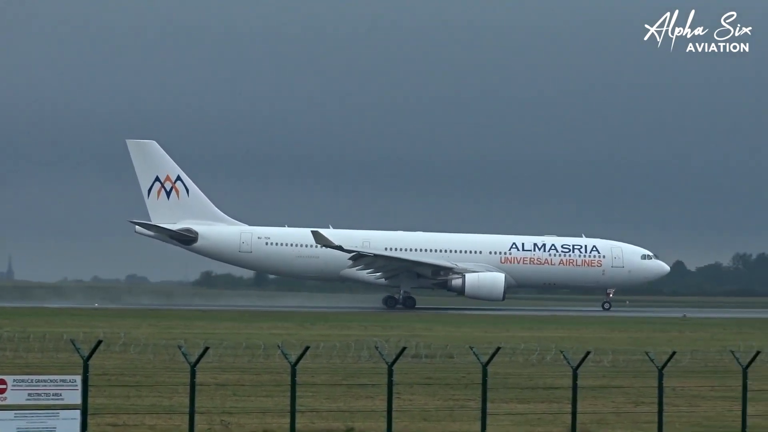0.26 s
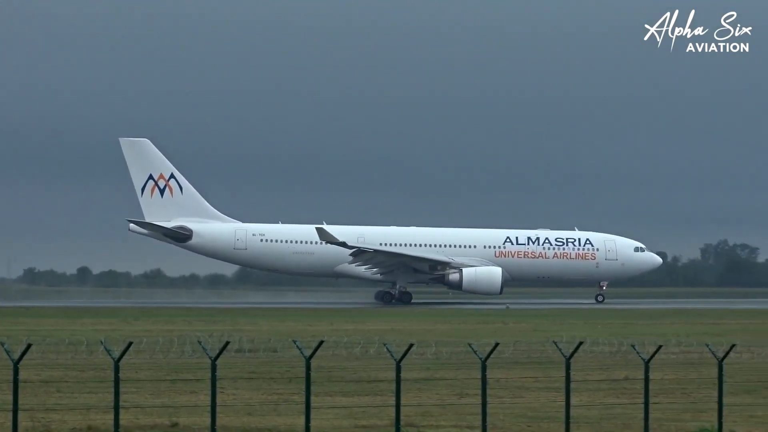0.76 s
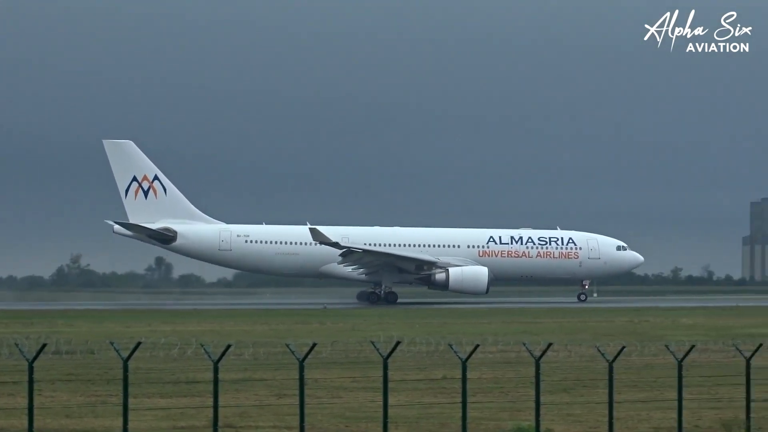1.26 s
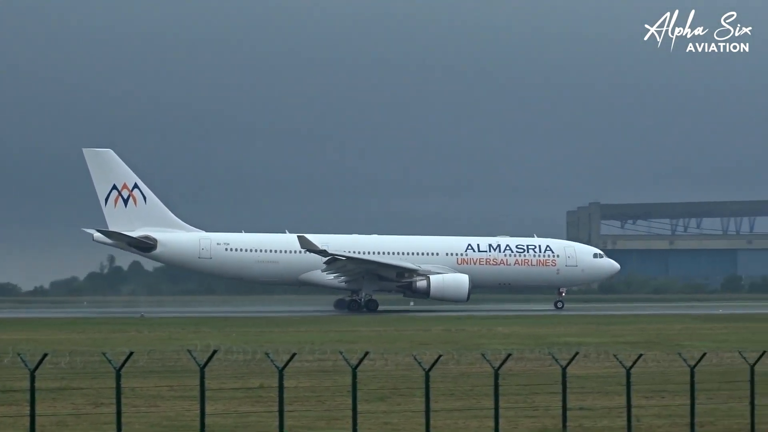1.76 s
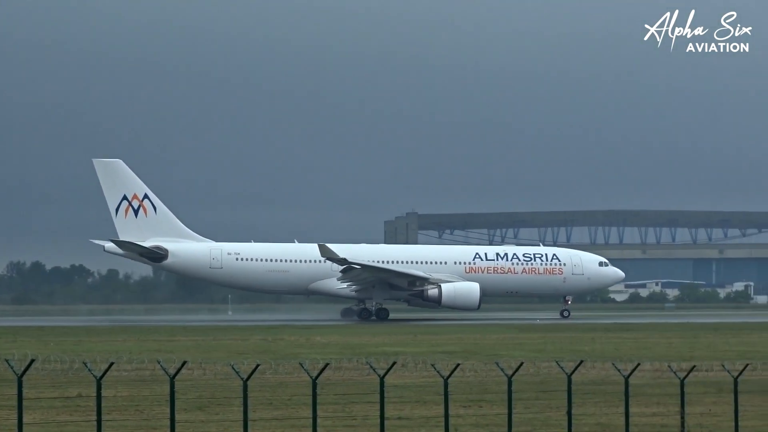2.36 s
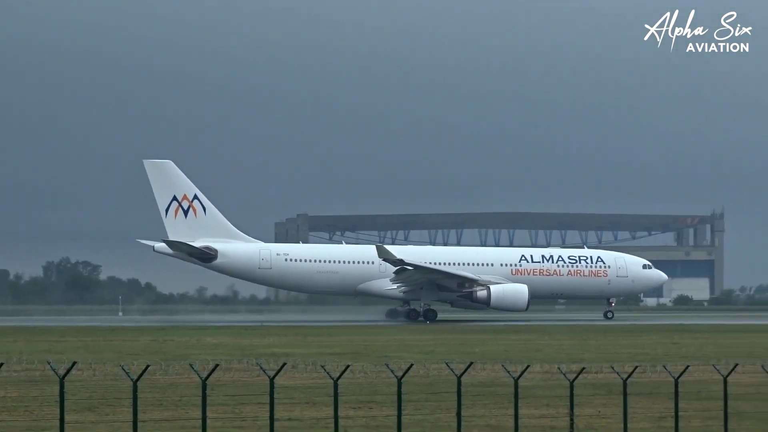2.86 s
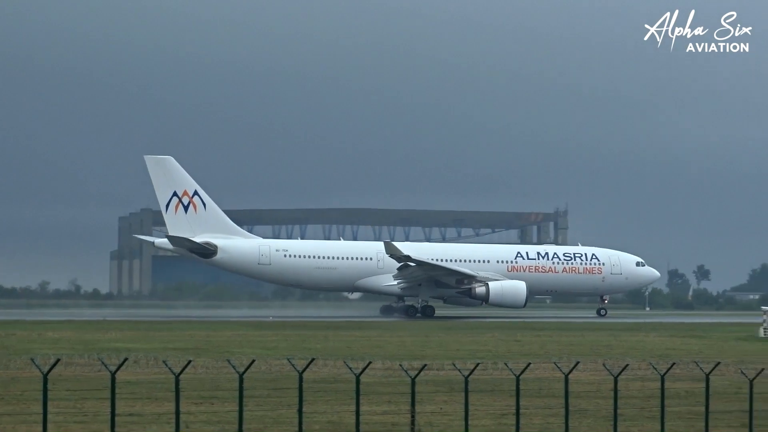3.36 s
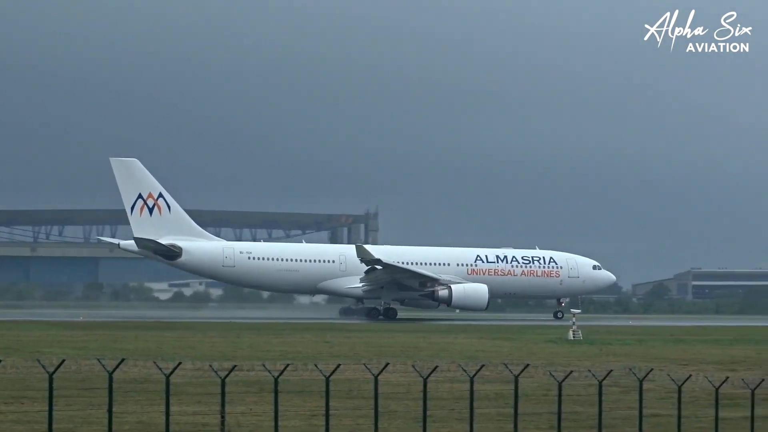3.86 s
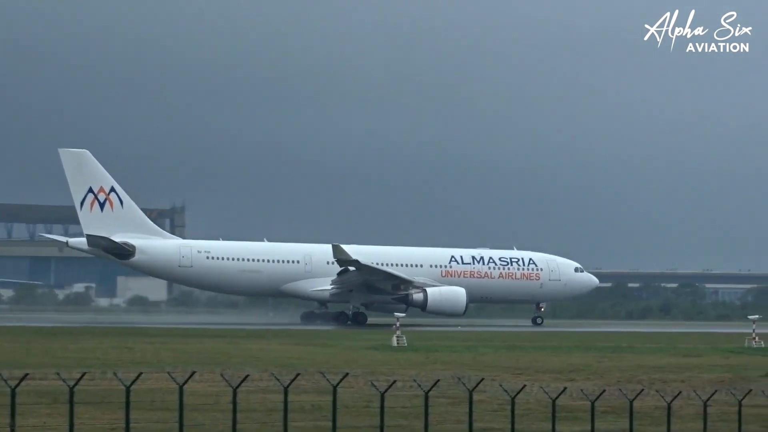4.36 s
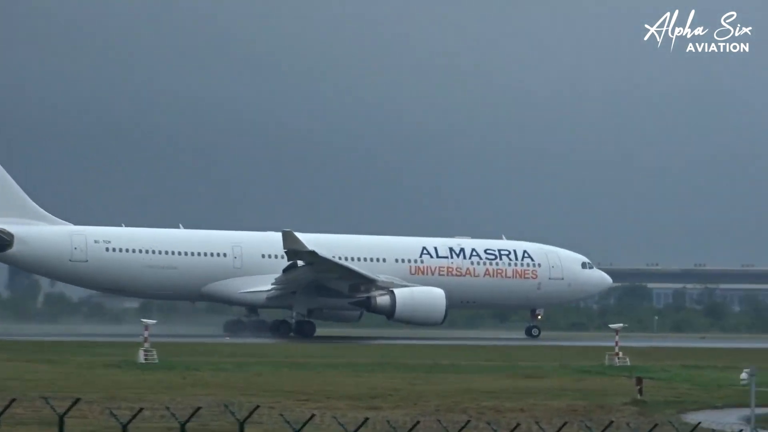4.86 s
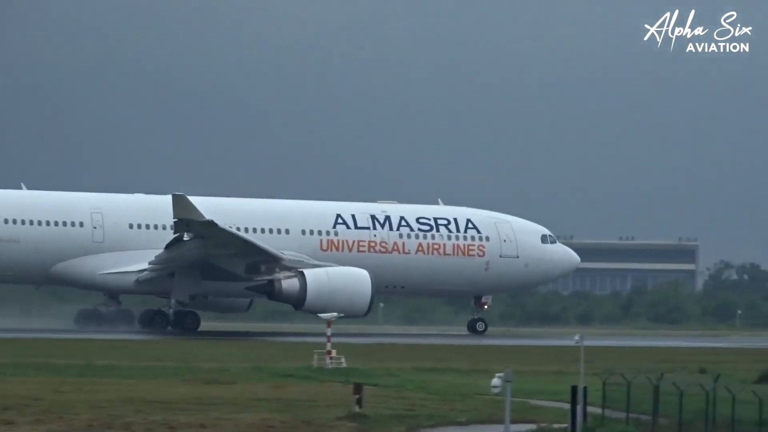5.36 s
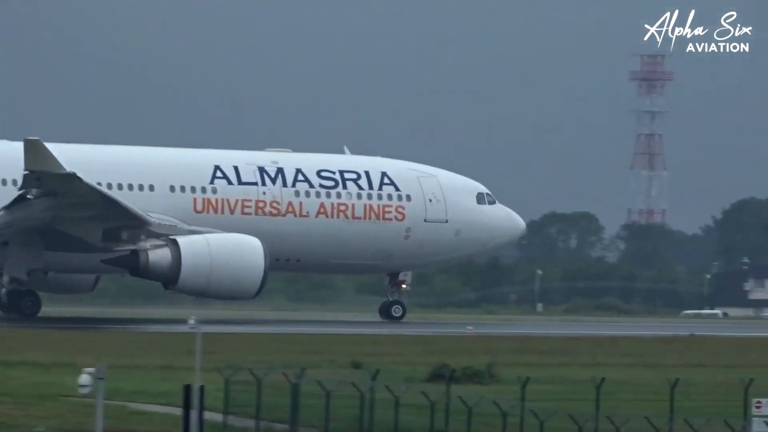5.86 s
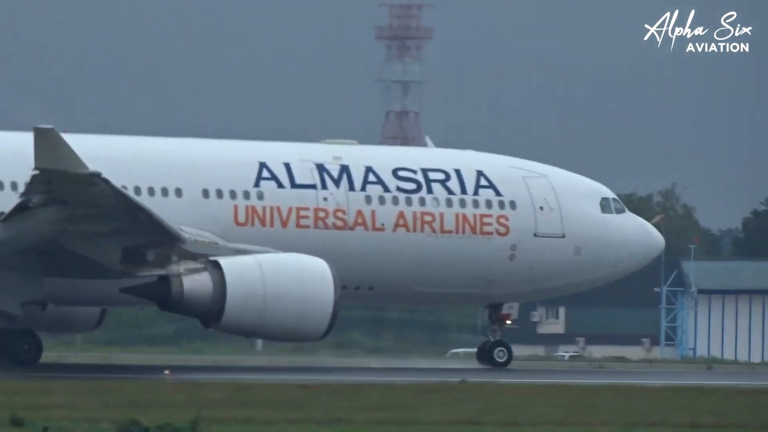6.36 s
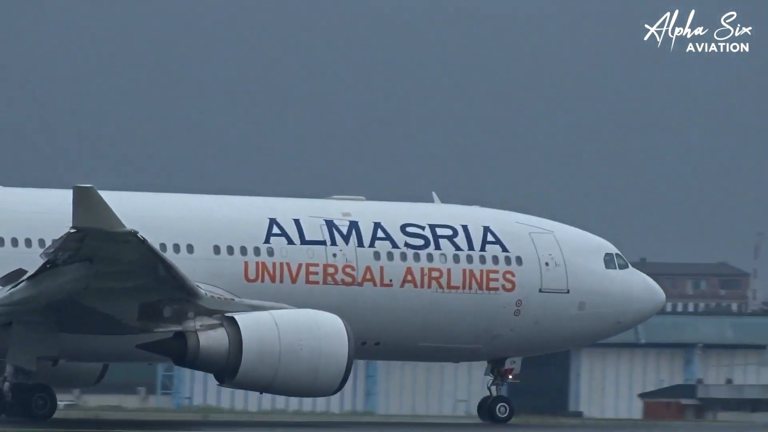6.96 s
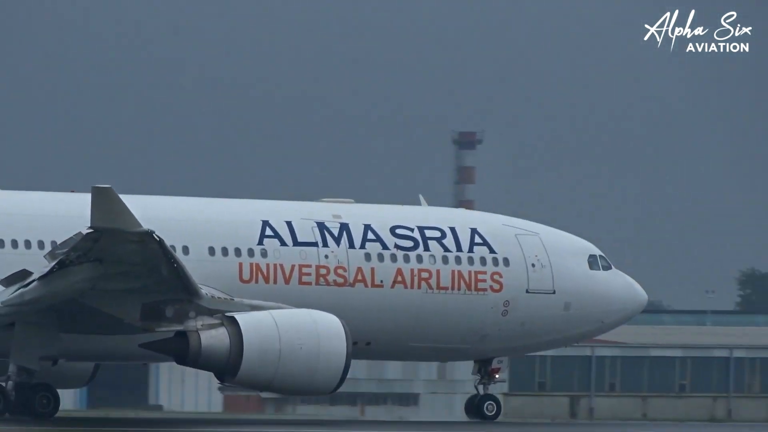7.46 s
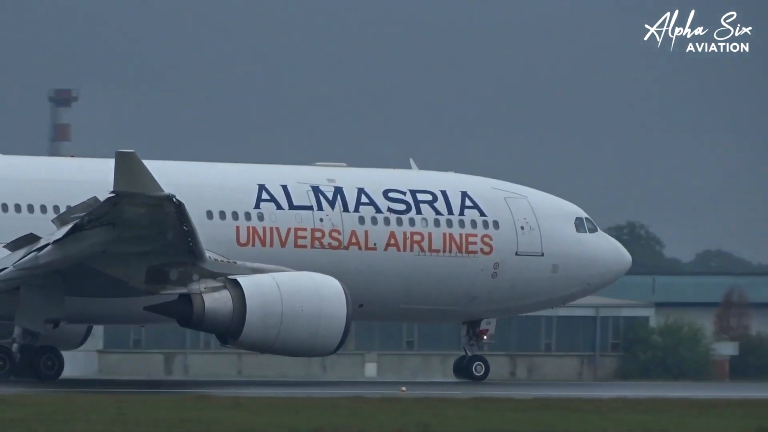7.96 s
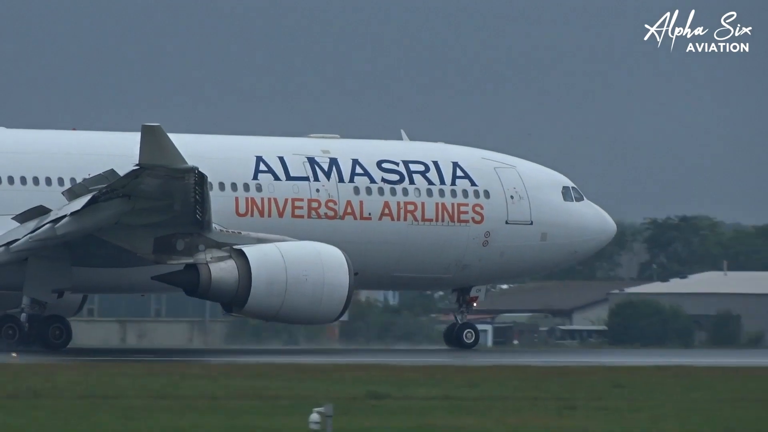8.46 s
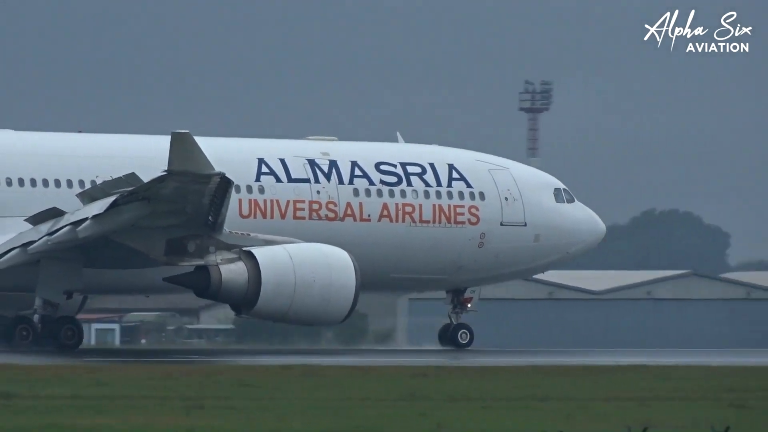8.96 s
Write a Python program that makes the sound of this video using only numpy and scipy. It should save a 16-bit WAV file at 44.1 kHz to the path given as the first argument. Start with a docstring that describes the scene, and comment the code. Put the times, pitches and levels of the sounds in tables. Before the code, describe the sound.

Outdoors by an airport fence, a large jet runs along a wet runway. A strong, fast-throbbing fan drone leads for about three seconds, then frays and fades beneath a rough, fluctuating exhaust roar with a thin, slowly sinking turbine whine. Wind gusts buffet and thump the open stereo microphone, and a few tiny raindrops tick close by.

```python
"""A throbbing fan drone comes first: a twin-engine airliner on a wet runway, heard from the airport fence.
Two sine-like fan tones beat; scattered tones make the turbine whine, the whistle and the airy treble.
The exhaust roar is noise in three registers with a ground echo; drifting noise bands strengthen its peaks.
At the microphone, noise gusts buffet, eddies thump and boom, and a few raindrops tick close by."""
import sys
import numpy as np
from scipy import signal
from scipy.fft import irfft
from scipy.io import wavfile

SR = 44100
rng = np.random.default_rng(int(sys.argv[2]) if len(sys.argv) > 2 else 0)


def master_out(mix):
    """Clip the mix to full scale and print it as 16-bit PCM to the path in sys.argv[1]."""
    frames = np.transpose(np.atleast_2d(mix))
    ceiling = np.clip(frames, -1, 1)
    pcm = np.round(ceiling * 32767).astype(np.int16)
    wavfile.write(sys.argv[1], SR, pcm)


N = 406153
TIME = np.arange(N) / SR
FREQS = np.maximum(np.arange(N // 2 + 1) * SR / N, 1)


def from_db(db):
    """Decibels to gain."""
    return 10 ** (np.asarray(db) / 20)


def rms_one(x):
    """Scale to unit power."""
    return x / np.sqrt(np.mean(x ** 2) + 1e-20)


def in_time(rows):
    """Each column of a time curve, joined by straight lines at every sample."""
    t, *columns = np.transpose(rows)
    return [np.interp(TIME, t, column) for column in columns]


def over_hz(points):
    """A spectrum's points joined on a log-frequency axis."""
    hz, value = np.transpose(points)
    return np.interp(np.log(FREQS), np.log(hz), value)


def bell(centre, width):
    """Gaussian envelope in time; width is its standard deviation in s."""
    return np.exp(-np.minimum(((TIME - centre) / width) ** 2, 40) / 2)


def drift(rate):
    """Slow chance of unit power: noise through two equal low-pass poles at rate Hz."""
    step = 40   # samples between slow values
    pole = np.exp(-2 * np.pi * rate * step / SR)
    chance = rng.standard_normal(N // step + 2002)
    slow = signal.lfilter([1], [1, -2 * pole, pole ** 2], chance)[2000:]   # skip the filter's start
    return np.interp(np.arange(N) / step, np.arange(len(slow)), rms_one(slow))


def noise_spectrum(colour, likeness):
    """Stereo noise spectrum: the balance of mid and side sets how alike left and right are."""
    real, imaginary = rng.standard_normal((2, 2, len(FREQS)))
    mid, side = real + 1j * imaginary
    alike = np.clip(over_hz(likeness), -1, 1)
    stereo = np.sqrt(1 + alike) * mid + np.sqrt(1 - alike) * side * [[1], [-1]]
    return from_db(over_hz(colour)) * stereo


def as_sound(spectrum):
    """Spectrum to a waveform of unit power."""
    return rms_one(irfft(spectrum, N))


def tone(hz, level_db, scatter, scatter_hz):
    """A tone after turbulent air: a steady ray plus a scattered part of wandering size and phase."""
    wander = drift(scatter_hz) + 1j * drift(scatter_hz)
    ray = (1 + scatter * wander) / np.sqrt(1 + 2 * scatter ** 2)
    carrier = np.exp(2j * np.pi * np.cumsum(hz) / SR)
    return from_db(level_db) * rms_one(np.real(ray * carrier))


# pitch of the near fan, sinking overall as the aircraft goes by: t/s, f/Hz
FAN_PITCH = [(0, 365.5), (1.4, 362.5), (2, 358.5), (3.1, 356.8), (3.45, 362.3), (4.15, 362.5), (4.4, 359.5),
             (5, 361), (5.3, 354.5), (6.2, 351)]
# drone of the near fan, before waver, dips and fade: t/s, level/dB
NEAR_FAN = [(0, -22), (.6, -22.5), (.72, -23.5), (.88, -21), (1, -19), (1.12, -24.5), (1.36, -25.5),
            (1.5, -22.5), (1.56, -21), (1.66, -24), (1.78, -23.5), (1.86, -31), (1.99, -20), (2.08, -26.5),
            (2.2, -23.5), (2.33, -19.5), (2.65, -19), (2.72, -14), (2.8, -16), (2.9, -16.7), (2.96, -15.2),
            (3.1, -18), (3.25, -22.5), (3.33, -32), (3.39, -22.5), (3.43, -25), (3.47, -18.5), (3.53, -34),
            (3.7, -30.5), (4.3, -32), (4.46, -29), (4.55, -19.5), (4.7, -30.5), (4.85, -42.5), (5.02, -30),
            (5.4, -35), (5.8, -35), (6.2, -41.5), (6.6, -43)]
# drone of the far fan, before dips and fade: t/s, level/dB
FAR_FAN = [(0, -39.5), (.9, -38.5), (1.25, -42), (1.62, -29.5), (2, -28), (2.3, -24.5), (2.5, -30),
           (3, -42), (3.2, -46)]
# brief drops of the drone on its deepest beats: t/s, extra depth/dB
DRONE_DIPS = [(.237, 11), (.31, 18), (.399, 1), (.665, 8), (.811, 11), (.883, 3), (1.041, 12), (1.414, 7),
              (1.605, 21), (1.683, 5), (1.895, 10), (2.047, 0), (2.107, 16), (2.19, 4), (2.254, 8),
              (2.338, 3), (3.284, 13)]


def fans(waver_db=1.28, waver_rate=6, beats_per_s=13, dip_s=0.0051):
    """Two fans a few hertz apart throb together; their drone beams forward, then frays and fades."""
    (hz,), (near_db,), (far_db,) = in_time(FAN_PITCH), in_time(NEAR_FAN), in_time(FAR_FAN)
    # a whole number of beats fits from dip to dip
    marks = np.array([0] + [t for t, _ in DRONE_DIPS] + [TIME[-1]])
    beat_counts = np.round(np.diff(marks, prepend=0) * beats_per_s)
    beats = np.interp(TIME, marks, np.cumsum(beat_counts))
    sharper_hz = np.gradient(beats) * SR   # the far fan runs this much sharper
    dip_db = sum(depth_db * bell(t, dip_s) for t, depth_db in DRONE_DIPS)

    frayed = np.interp(TIME, [3.2, 5, 6.2], [.13, .28, .7])
    near = tone(hz, near_db + waver_db * drift(waver_rate), scatter=frayed, scatter_hz=48.6)
    near = near * np.interp(TIME, [6.5, 7.2], [1, 0])
    far = tone(hz + sharper_hz, far_db, scatter=0.3, scatter_hz=23)
    far = far * np.interp(TIME, [3.2, 5.5], [1, 0])
    # opposite signs, so steady tones pull against each other on the dips
    return (near - far) * from_db(-dip_db) * from_db([[.1], [-.1]])


# exhaust roar by register, before trim and flutter: t/s, body level/dB, rasp level/dB, hiss level/dB
ROAR_LEVELS = [(0.0, -34, -41, -51), (0.13, -33.5, -36, -45.5), (0.6, -27, -35.5, -48),
               (1.15, -29, -36, -48.5), (1.6, -29, -35.5, -48), (2, -31, -40, -49),
               (2.45, -26.5, -35, -46.5), (2.9, -30, -37, -46), (3.26, -27, -35, -44),
               (3.8, -35, -42, -45.5), (4.27, -38.5, -41.5, -45), (4.58, -37, -36, -44),
               (4.93, -33, -32, -41.5), (5.179, -33, -38, -46.5), (5.55, -30.5, -31.5, -46),
               (5.77, -31, -36, -42), (6.0, -29.5, -34, -47.5), (6.27, -30.5, -38.5, -49.5),
               (6.62, -31.5, -34.5, -45.5), (6.98, -33.5, -41, -51), (7.3, -36.5, -43.5, -47),
               (7.7, -34, -37.5, -44), (8.2, -30.5, -34, -46), (8.47, -34.5, -39, -49),
               (8.75, -31, -32, -44), (9.05, -27.5, -34, -46.5), (9.21, -30.5, -31, -42)]
# colour of the roar, before splitting into registers: f/Hz, density level/dB per Hz
ROAR_COLOUR = [(30, -10.5), (80, -19), (270, -2.5), (480, 2.5), (750, 2), (1200, -4.5), (1580, -5),
               (1900, -6.5), (2280, -7.5), (2620, -15.5), (2980, -18), (3400, -23), (4500, -20.5),
               (7200, -34), (9500, -57)]
# left-right likeness of the roar, used for the faint hiss too: f/Hz, correlation
ROAR_LIKENESS = [(60, .9), (300, .96), (700, .99), (1500, .96), (2200, .95), (3000, .82), (4500, .99),
                 (7000, .98), (15000, .95)]
# echo off the ground: t/s, delay/s, strength (0-1, before treble loss)
GROUND_ECHO = [(0, .00115, .15), (1.5, .00112, .2), (3, .0011, .12), (3.9, .00092, .45),
               (4.35, .00092, .45), (4.55, .00115, .15), (4.8, .00134, .25), (5.3, .00132, .45),
               (5.7, .0013, .48), (6.1, .00134, .5), (6.7, .00139, .45), (7.3, .0014, .3), (8, .00137, .42),
               (8.6, .00133, .38), (9.21, .00131, .4)]


def roar(rasp_hz=1150, hiss_hz=2800, grass_hz=2700, flutter_db=1.13, flutter_rate=7):
    """Jet mixing noise; the ground echo cuts moving notches and the air makes each register flutter."""
    spectrum = noise_spectrum(ROAR_COLOUR, ROAR_LIKENESS)
    delay, strength = in_time(GROUND_ECHO)
    grass = 1 / (1 + (FREQS / grass_hz) ** 4)   # rough ground mirrors little treble
    below_rasp = 1 / (1 + (FREQS / rasp_hz) ** 10)
    below_hiss = 1 / (1 + (FREQS / hiss_hz) ** 10)
    registers = below_rasp, below_hiss - below_rasp, 1 - below_hiss
    trims_db, pans_db = (-1.0, -.8, -.4), (.45, .6, .2)
    out = 0
    for share, level_db, trim_db, pan_db in zip(registers, in_time(ROAR_LEVELS), trims_db, pans_db):
        direct = irfft(spectrum * share, N)
        mirrored = irfft(spectrum * share * grass, N)
        echo = np.array([np.interp(TIME - delay, TIME, side) for side in mirrored])
        gain = from_db(level_db + trim_db + flutter_db * drift(flutter_rate))
        out = out + rms_one(direct + strength * echo) * gain * from_db([[pan_db], [-pan_db]])
    return out


# bands where the ground echo strengthens the roar, one curve each: t/s, centre f/Hz,
# level/dB before a slight pan
ECHO_PEAK_CURVES = [
    [(0, 1050, -38.5), (.35, 1050, -43), (.6, 1047, -35.5), (1.15, 990, -35), (1.4, 985, -44),
     (1.62, 980, -30.5), (1.95, 930, -43), (2.4, 740, -34.5), (3, 730, -42), (3.35, 726, -29),
     (4, 937, -47), (4.35, 950, -48), (4.57, 930, -33), (4.95, 825, -29), (5.2, 810, -36.5),
     (5.5, 795, -34), (5.68, 780, -29), (5.95, 750, -30), (6.15, 700, -32.5), (6.4, 655, -32.5),
     (6.65, 635, -32), (6.9, 645, -49), (7.2, 657.4, -53), (7.85, 720, -32), (8.4, 660, -44.5),
     (9.21, 718, -41)],
    [(.3, 1640, -58), (.6, 1630, -38), (1.2, 1640, -50), (1.6, 1640, -44), (2, 1640, -64)],
    [(1.9, 1200, -45), (2.3, 1200, -40.5), (2.9, 1230, -48.5), (3.5, 1230, -39), (3.9, 1300, -57),
     (4.4, 1280, -51), (4.55, 1280, -40), (4.85, 1260, -39), (5.2, 1500, -54), (5.6, 1620, -35),
     (6.2, 1500, -62), (6.65, 1440, -35), (7.2, 1480, -78), (7.6, 1470, -38.5), (8.2, 1480, -47),
     (8.45, 1480, -42), (8.9, 1500, -40.5), (9.21, 1550, -35)],
    [(3.4, 2100, -57), (3.95, 2100, -46), (4.3, 2150, -55), (4.72, 2190, -34), (5.15, 2150, -58)],
    [(5.4, 990, -44), (5.9, 970, -41.5), (6.65, 940, -34.5), (7.2, 930, -51)],
    [(4.4, 2970, -66), (4.85, 2930, -42.5), (5.2, 2960, -74), (5.9, 2960, -58), (6.6, 2830, -50),
     (6.9, 2800, -66)],
]


def echo_peaks(width_hz=112, fade_s=.1):
    """Drifting noise bands, added where the ground echo strengthens the roar."""
    out = 0
    for curve in ECHO_PEAK_CURVES:
        start, end = curve[0][0], curve[-1][0]
        present = np.clip(1 + np.minimum(TIME - start, end - TIME) / fade_s, 0, 1)
        out = out + present * tone(*in_time(curve), scatter=24, scatter_hz=width_hz)
    return out * from_db([[.4], [-.4]])


# turbine pitch before waver, sinking as the aircraft goes by: t/s, f/Hz
TURBINE_PITCH = [(0, 4450), (1, 4435), (2, 4395), (3, 4345), (4, 4260), (4.8, 4195), (5.7, 4110),
                 (7.3, 3970), (8, 3915), (9.21, 3800)]
# blade stages: multiple of the turbine pitch, scatter (ratio to the steady ray), scatter rate f/Hz
BLADE_STAGES = [(1, 1.3, 60), (1.134, 9, 165), (1.267, 9, 150)]
# whine of each stage: t/s, low level/dB, middle level/dB, high level/dB
WHINE_LEVELS = [(0, -60, -68, -75), (.2, -50.5, -65, -73), (.6, -64, -69, -75), (1.1, -54, -71, -76),
                (1.4, -63, -74, -87), (2, -56, -69, -78), (2.78, -55.5, -60, -80.5), (2.97, -57, -63, -70),
                (3.2, -52, -64, -73), (3.55, -54, -71, -75), (4.15, -58, -71, -75), (4.4, -54, -53, -72),
                (4.85, -50, -58, -66), (5.15, -54, -51.5, -66), (5.55, -58, -53, -68),
                (5.73, -63, -53, -53), (6.1, -66, -56, -68), (6.9, -58, -56, -66), (7.25, -58, -54, -54),
                (7.9, -54.5, -51, -61), (8.4, -58, -55, -72), (8.75, -54, -54, -51), (9.21, -61, -51, -64)]
# clear flares and blips of the lowest blade tone: middle t/s, length/s, level/dB
FLARES = [(2.99, .1, -43.5), (3.13, .2, -47), (3.312, 0.053, -47), (3.44, .045, -44), (3.627, .04, -53),
          (4.37, .1, -54)]


def turbines(waver_hz=12, waver_rate=6):
    """High blade tones sink together, wavering and frayed into narrow bands by the hot exhaust."""
    hz, = in_time(TURBINE_PITCH)
    whine = 0
    for (multiple, scatter, scatter_hz), level_db in zip(BLADE_STAGES, in_time(WHINE_LEVELS)):
        stage_hz = multiple * hz + waver_hz * drift(waver_rate)
        whine = whine + tone(stage_hz, level_db, scatter, scatter_hz)
    flare = 0
    for middle, length, level_db in FLARES:
        shape = np.exp(-np.minimum((2 * (TIME - middle) / length) ** 4, 40))   # flat top, steep sides
        flare = flare + from_db(level_db) * shape
    clear = flare * tone(hz + waver_hz * drift(waver_rate), 0, scatter=0.26, scatter_hz=50)
    return whine + clear


# thin whistle from behind the engines: t/s, f/Hz, level/dB
WHISTLE_CURVE = [(0, 9100, -76.5), (4.2, 8800, -82.5), (5, 8640, -80), (6.3, 8580, -79), (7, 8600, -80),
                 (7.7, 8500, -66), (9.21, 8370, -68)]


def whistle():
    """A thin whistle from behind the engines, scattered into a narrow band of noise."""
    return tone(*in_time(WHISTLE_CURVE), scatter=8, scatter_hz=300)


# airy bands high in the treble: centre f/Hz, scatter rate f/Hz, level/dB relative to the shared curve
AIR_BANDS = [(6950, 330, 12), (8400, 250, 1.5), (10700, 170, -1.5), (11420, 250, 2), (14250, 380, -1.5),
             (15300, 330, 1.5)]
# shared curve of the bands, while the engines are abeam: t/s, level/dB
AIR_LEVEL = [(4.1, -91), (4.5, -74), (5.7, -72.5), (6.35, -78), (6.6, -95)]


def airy_bands():
    """Fixed tones, scattered almost wholly into noise bands, rise and fade together."""
    air_db, = in_time(AIR_LEVEL)
    return sum(tone(np.full(N, centre_hz), air_db + band_db, scatter=10, scatter_hz=width_hz)
               for centre_hz, width_hz, band_db in AIR_BANDS)


def gust(start, length):
    """A gust builds quickly, holds and dies away exponentially."""
    attack_s, release_s = 0.031, 0.11
    rise = np.minimum(TIME - start, 0) / attack_s
    fall = np.maximum(TIME - start - length, 0) / release_s
    return np.exp(rise - fall)


# gusts on the microphone: start t/s, length/s, buffet level/dB before make-up gain, rumble level/dB
GUSTS = [(0, 0.44, -32, -45), (0.137, .05, -27, -50), (0.262, 0.057, -27.5, -50),
         (0.762, 0.057, -37, -34.5), (.9, 0.16, -44.5, -44.5), (1.1, 0.89, -48.5, -47),
         (1.87, 0.042, -37, -50), (2.085, 0.49, -42.5, -45), (3.37, .12, -34, -47), (3.51, .25, -30, -51),
         (3.767, 0.44, -30.5, -42), (4.51, 0.23, -37.5, -44), (5.089, 0.057, -29, -36),
         (5.27, 0.1, -41, -44), (6.66, 0.77, -33, -48), (7.592, .12, -32, -57), (7.778, 0.27, -36, -50),
         (8.25, 0.082, -33, -45), (8.332, 0.052, -33.5, -33), (8.453, 0.09, -39, -38),
         (8.65, 0.24, -36.5, -41), (9.116, .1, -32, -40)]
# short, hard lumps of air within the gusts: t/s, level/dB before make-up gain
AIR_LUMPS = [(.159, -23.5), (.27, -21.5), (.389, -33.5), (1.88, -26), (3.554, -25), (3.691, -25),
             (3.788, -31), (3.883, -26), (4.068, -28), (4.213, -26), (5.148, -30), (6.69, -26.5),
             (6.802, -28), (6.847, -36), (7.16, -25), (7.256, -27.5), (7.353, -24.5), (7.432, -29.5),
             (7.609, -29), (7.687, -27.5), (7.819, -32), (8.73, -27)]
# colour of the buffeting: f/Hz, density level/dB per Hz
WIND_COLOUR = [(15, -30), (30, -18.5), (60, -8.5), (110, -3.5), (200, -2), (320, -1), (500, -6.5),
               (900, -16), (2000, -25.5), (5000, -63.5), (12000, -90.5)]
# colour of the deep rumble from broad eddies: f/Hz, density level/dB per Hz
RUMBLE_COLOUR = [(15, -19), (40, -0.5), (80, 2.5), (140, -6), (300, -27.5), (1000, -56), (6000, -95)]
# left-right likeness at the microphone ports, opposed in the middle register: f/Hz,
# correlation (clipped to -1..1)
WIND_LIKENESS = [(40, 0.95), (65, 0.96), (130, 0.45), (250, -0.16), (500, -0.46), (1000, -1.1),
                 (2500, 0.32)]


def wind(lump_db=2.5, lump_rate=35, surge_db=1.0, surge_rate=12, gain_db=6.0):
    """Eddies hit each microphone port in lumps of their own; between gusts a light breeze is left."""
    breeze_db, breeze_swing_db, lump_s = -55.5, 3, 0.0094   # breeze level is before gain_db
    force = from_db(breeze_db + breeze_swing_db * drift(4.6))
    depth = 0
    for start, length, level_db, rumble_db in GUSTS:
        blow = gust(start, length)
        force = np.maximum(force, from_db(level_db) * blow)
        depth = np.maximum(depth, from_db(rumble_db) * blow)
    for t, level_db in AIR_LUMPS:
        force = np.maximum(force, from_db(level_db) * bell(t, lump_s))
    port_lumps = np.array([drift(lump_rate), drift(lump_rate)])
    lumps = from_db(surge_db * drift(surge_rate) + lump_db * port_lumps)
    turbulence = rms_one(as_sound(noise_spectrum(WIND_COLOUR, WIND_LIKENESS)) * lumps)
    rumble = depth * as_sound(noise_spectrum(RUMBLE_COLOUR, WIND_LIKENESS))
    return from_db(gain_db) * force * turbulence + rumble


# strong eddies that thump the microphone: t/s, level/dB before the kick and puff gains
EDDY_THUMPS = [(0.158, -24), (0.284, -17), (0.384, -17), (5.137, -25), (6.799, -24), (6.917, -14.5),
               (7.006, -27), (7.015, -22), (7.152, -13.5), (7.352, -26), (7.68, -18), (8.251, -14)]
# colour of a thump's puff: f/Hz, density level/dB per Hz
THUMP_COLOUR = [(30, -22), (90, 9), (300, 7), (600, 7), (1200, -0.5), (3000, -15.5), (8000, -85)]


def thumps(rise_s=0.00055, fall_s=0.0052, kick_s=0.00032, kick_db=1.5, puff_db=-3):
    """A hard eddy bursts on the ports: one swing of pressure and a short puff of noise."""
    blow, kick = 0, 0
    for t, level_db in EDDY_THUMPS:
        decay = np.maximum((t - TIME) / rise_s, (TIME - t) / fall_s)
        blow = blow + from_db(level_db) * np.exp(-np.clip(decay, 0, 20))
        swing = np.clip((TIME - t - rise_s) / kick_s, -10, 10)
        kick = kick + from_db(level_db) * swing * np.exp(-swing ** 2 / 2)
    puff = blow * as_sound(noise_spectrum(THUMP_COLOUR, WIND_LIKENESS))
    return from_db(kick_db) * kick + from_db(puff_db) * puff


# deep, slow eddies that boom on the microphone: t/s, level/dB
EDDY_BOOMS = [(4.07, -33), (5.12, -38), (8.37, -26)]


def booms(width_s=0.024, boom_hz=61):
    """A broad eddy pushes both ports together through a few slow swings of pressure."""
    out = 0
    for t, level_db in EDDY_BOOMS:
        swing = np.sin(2 * np.pi * boom_hz * (TIME - t) + drift(32))
        out = out + from_db(level_db) * bell(t, width_s) * swing
    return out


# raindrops near the microphone: t/s, splash level/dB (scales noise and modes), knock level/dB
RAINDROPS = [(0.568, -30.5, -44), (3.993, -50, -31), (4.0416, -28, -29), (6.3774, -38, -39),
             (6.383, -35, -29), (6.68, -39, -45), (6.8199, -41, -45), (6.8573, -35, -44),
             (7.7991, -38, -48), (8.5086, -41, -48), (8.6807, -39, -48)]
# short modes the drops ring with: f/Hz, level/dB before chance, t60/s
DROP_MODES = [(8300, -3, 0.0033), (11200, -6, 0.0046)]


def raindrops(splash_db=-7, splash_t60=0.014, port_lag_s=.00001):
    """Each drop is a tiny noise splash ringing short modes, with a knock of the microphone casing."""
    casing_hz, casing_t60_s = 3090, 0.015
    out, age = np.zeros(N), TIME[:SR // 20]
    chance = rng.standard_normal((len(RAINDROPS), len(DROP_MODES) + len(age)))
    bright = signal.butter(2, 7000, "high", fs=SR, output="sos")
    knock = from_db(-60 * age / casing_t60_s) * np.sin(2 * np.pi * casing_hz * age)
    for (t, peak_db, knock_db), draws in zip(RAINDROPS, chance):
        splash = signal.sosfilt(bright, draws[-len(age):])
        tick = splash * from_db(splash_db - 60 * age / splash_t60)
        for (hz, mode_db, t60), extra_db in zip(DROP_MODES, 2 * draws):
            ring = np.sin(2 * np.pi * hz * age)
            tick = tick + from_db(mode_db + extra_db - 60 * age / t60) * ring
        at = int(t * SR)
        out[at:at + len(age)] += from_db(peak_db) * tick + from_db(knock_db) * knock
    return np.array([out, np.interp(TIME - port_lag_s, TIME, out)])   # the right port hears it later


# colour of the faint hiss: f/Hz, density level/dB per Hz
HISS_COLOUR = [(3000, -5), (8000, 6.5), (11000, -0.5), (16000, 1)]


def faint_hiss():
    """Faint coloured noise that eases by about a decibel."""
    level_db = np.interp(TIME, [4.1, 4.6, 6.4, 6.7], [-60.3, -60.3, -60.9, -61.2])
    return from_db(level_db) * as_sound(noise_spectrum(HISS_COLOUR, ROAR_LIKENESS))


def scene():
    """The airliner, the weather at the microphone and a faint hiss."""
    airliner = fans() + roar() + echo_peaks() + turbines() + whistle() + airy_bands()
    weather = wind() + thumps() + booms() + raindrops()
    return airliner + weather + faint_hiss()


def record(dry):
    """A steep elliptic low-pass cuts the top of the treble."""
    cutoff_hz, ripple_db, rejection_db = 15750, .1, 80
    low_pass = signal.ellip(10, ripple_db, rejection_db, cutoff_hz, fs=SR, output="sos")
    return signal.sosfilt(low_pass, dry)


dry = scene()
out = record(dry)
master_out(out)
```